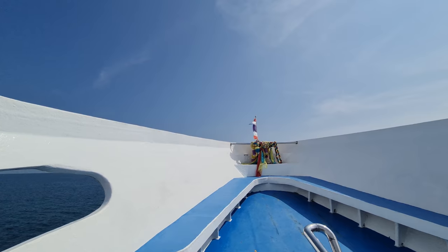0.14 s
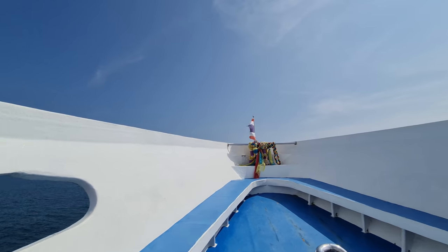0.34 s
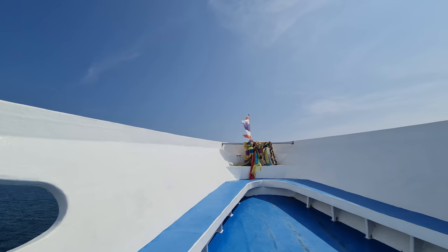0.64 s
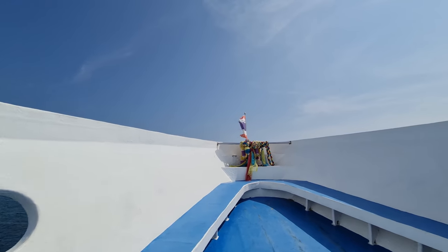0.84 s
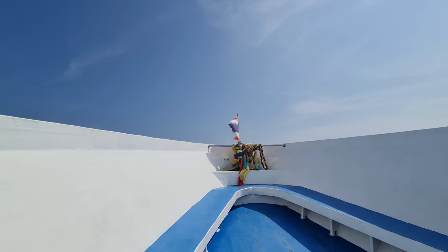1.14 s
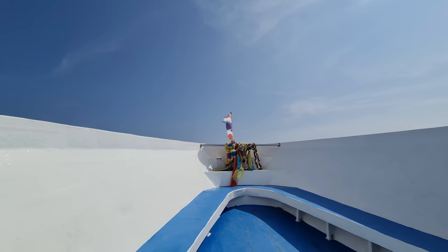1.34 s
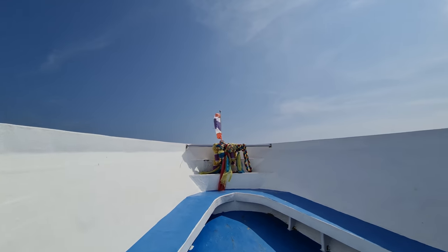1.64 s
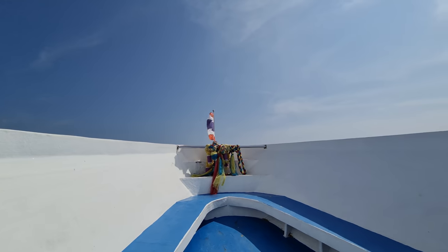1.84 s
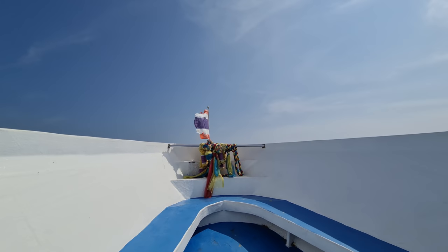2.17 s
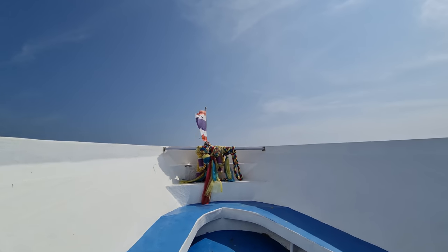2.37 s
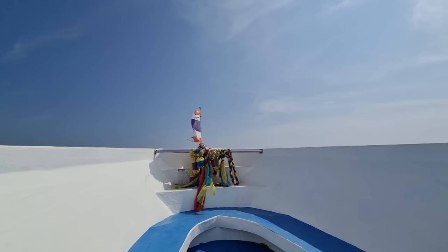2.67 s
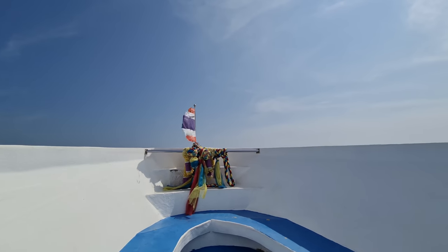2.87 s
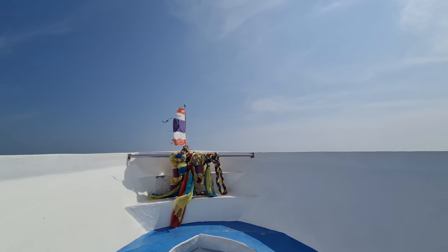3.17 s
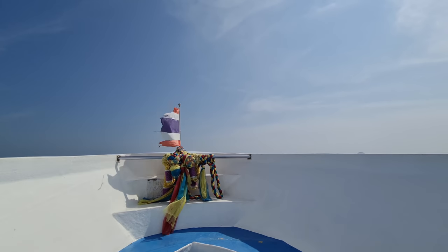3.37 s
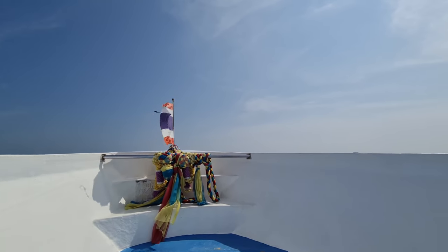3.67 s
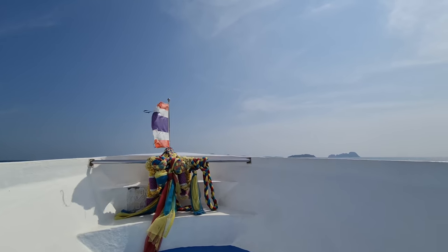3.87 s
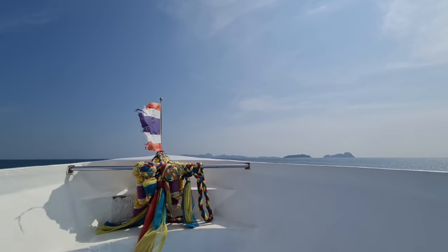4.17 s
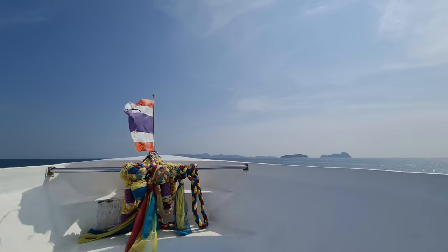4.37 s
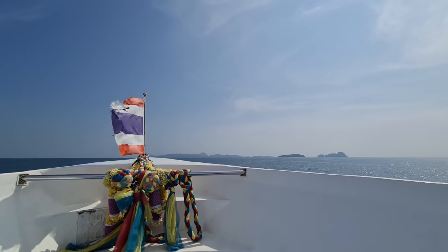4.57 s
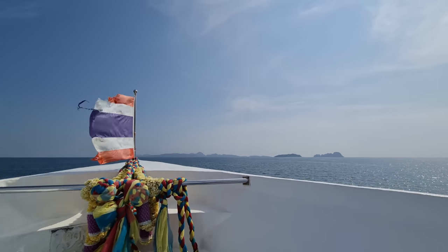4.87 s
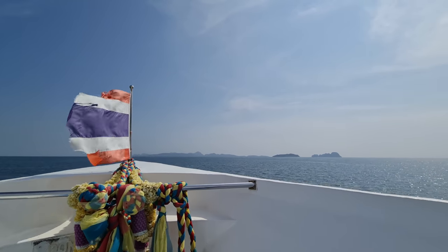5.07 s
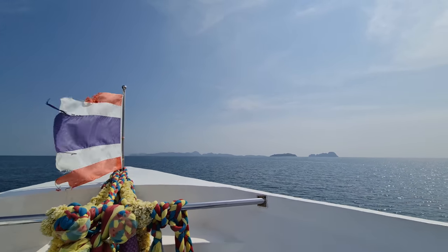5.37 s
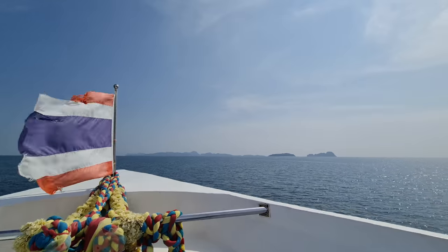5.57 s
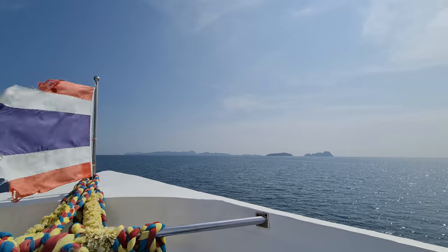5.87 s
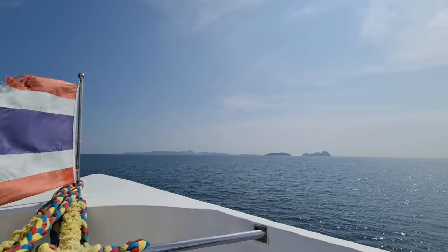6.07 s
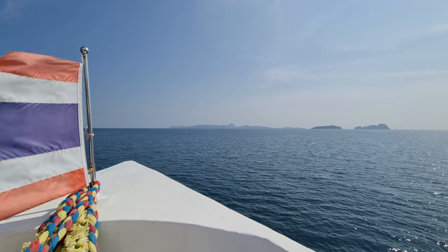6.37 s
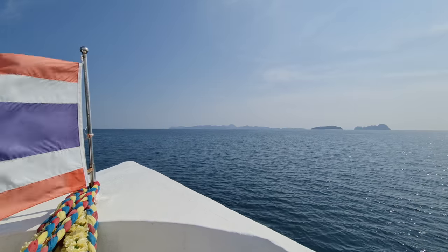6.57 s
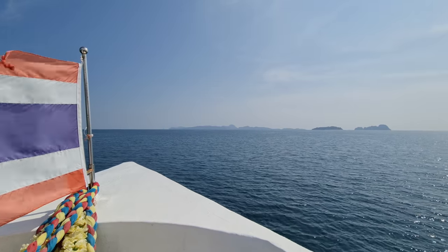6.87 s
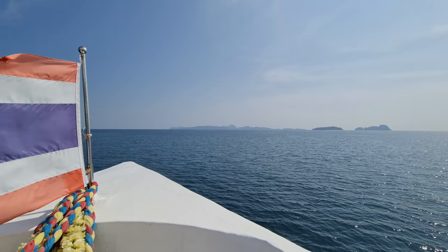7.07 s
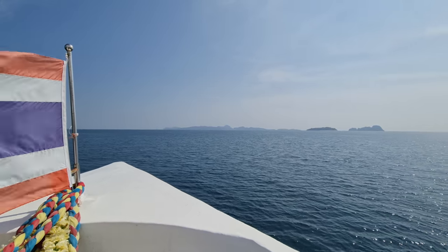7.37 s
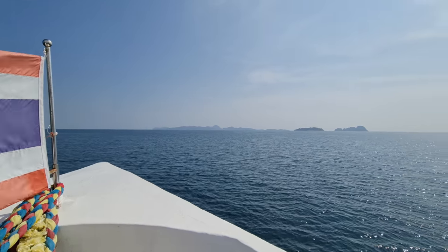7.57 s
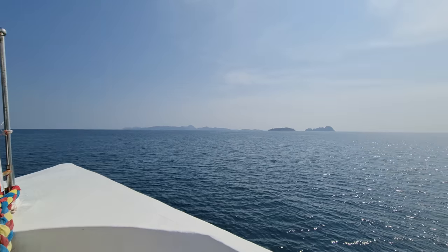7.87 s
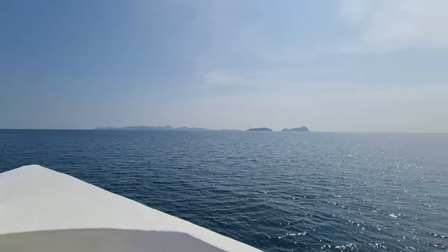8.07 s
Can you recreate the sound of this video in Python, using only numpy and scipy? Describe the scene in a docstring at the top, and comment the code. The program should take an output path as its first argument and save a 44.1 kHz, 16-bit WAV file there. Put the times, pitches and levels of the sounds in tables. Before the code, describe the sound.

On an open bow at sea, a wavering deep diesel hum and roar, buffeting wind, soft water hiss, then cloth flapping on a pole.

```python
"""On the open foredeck of a ferry, two microphone ports, left and right, facing the weather.
From the first moment the diesels drone through the hull as wavering tones over a noise roar, and the bow wave
hisses on both sides as shaped noise. Wind thumps, noise bursts that hit both ports together, come at once and
again from about 2 to 3 s. From 2.9 s a flag snaps on its pole: short noise puffs with a ringing knock.
At 6.35 s an edit jumps back and repeats the last stretch, with a click at the hard cut."""
import sys
import numpy as np
from scipy import signal
from scipy.io import wavfile
from scipy.ndimage import uniform_filter1d

SR = 44100
rng = np.random.default_rng(int(sys.argv[2]) if len(sys.argv) > 2 else 0)


def volts(x):
    """Linear amplitude factor 10**(x/20) for a level x in dB, scalar or array-like."""
    e = np.asarray(x, float) / 20
    return 10 ** e


def transcribe(signal):
    """Save signal, clipped to [-1, 1], as a 16-bit WAV file at the path in sys.argv[1]."""
    frames = np.atleast_2d(signal).T
    limited = np.clip(frames, -1, 1)
    pcm = np.round(limited * 32767).astype(np.int16)
    wavfile.write(sys.argv[1], SR, pcm)


N = 362943
CUT_S, REPEAT_S = 6.34624, 2.8  # time of the hard cut, and how far back it jumps
LENGTH = round(CUT_S * SR)  # samples before the cut
T = np.arange(LENGTH) / SR


def evened(x):
    """Scales to rms 1."""
    return x / np.sqrt(np.mean(abs(x) ** 2) + 1e-20)


def wander(shape, size):
    """Slow random drift of rms 1: white noise averaged twice over size samples."""
    once = uniform_filter1d(rng.standard_normal(shape), size=size)
    return evened(uniform_filter1d(once, size=size))


def read(points, hz):
    """Reads a spectrum table on a log-frequency axis."""
    f, value = np.transpose(points)
    return np.interp(np.log(hz + 1), np.log(f + 1), value)


def curve(table, column):
    """One dB column of a time table at every sample."""
    rows = np.array(table)
    return np.interp(T, rows[:, 0], rows[:, column])


def noise(spectrum, same, patchy_db, flicker_db, size):
    """Stereo noise from random short-time spectra with drifting patches and flicker across all bins."""
    frames, hz = 4 * LENGTH // size + 5, np.fft.rfftfreq(size, 1 / SR)
    a, b, c, d, patches = rng.standard_normal((frames, len(hz), 5)).T
    patches = evened(uniform_filter1d(uniform_filter1d(patches, 8, 0), 8, 1))
    same = np.clip(read(same, hz), -1, 1)[:, None]
    left = a + 1j * b
    right = same * left + np.sqrt(1 - same ** 2) * (c + 1j * d)
    flicker = flicker_db * rng.standard_normal(frames)
    z = np.array([left, right]) * volts(read(spectrum, hz)[:, None] + patchy_db * patches + flicker)
    return evened(signal.istft(z, nperseg=size, noverlap=3 * size // 4)[1][:, :LENGTH])


def colour(x, spectrum):
    """Causal minimum-phase filter with the given spectrum, energy 1."""
    half = np.maximum(read(spectrum, np.fft.rfftfreq(8192, 1 / SR)), -90) * np.log(10) / 20
    log_gain = np.r_[half, half[-2:0:-1]]
    taps = np.fft.ifft(np.exp(np.conj(signal.hilbert(log_gain)))).real[:4096]
    return signal.oaconvolve(x, taps[None] / np.linalg.norm(taps), axes=1)[:, :LENGTH]


def tone(hz, width, noisy):
    """A sine whose height and phase partly wander like narrow noise; higher tones differ more between the ports."""
    pole = np.exp(-np.pi * width / SR)
    drift = rng.standard_normal((2, LENGTH)) + 1j * rng.standard_normal((2, LENGTH))
    drift = evened(signal.lfilter([1], np.convolve([1, -pole], [1, -pole]), drift))
    noisy = np.clip(noisy, 0, 1)
    shared = np.sqrt(1 - noisy) + np.sqrt(noisy) * drift[0]
    both = shared + (hz + 100) / 1800 * np.array([drift[1], -drift[1]])
    pitch = hz * (1 + 0.00595 * wander(LENGTH, 9000))  # rms wander as a share of the pitch
    turns = np.cumsum(pitch) / SR + rng.random()
    return np.sqrt(2) * (both * np.exp(2j * np.pi * turns)).real


def bursts(rows, rise_s):
    """Stereo envelope of puffs that rise and die away: rows of (t/s, level/dB, left-right/dB, length/s)."""
    out = np.zeros((2, LENGTH + SR))
    for s, db, pan_db, length in rows:
        t = np.arange(0, 4 * length, 1 / SR)
        shape = (1 - np.exp(-t / rise_s)) * np.exp(-t / (length / 2))
        at = round(s * SR)
        out[:, at:at + len(t)] += volts(db + np.array([[.5], [-.5]]) * pan_db) * shape
    return out[:, :LENGTH]


# high, low and middle hull tone: f/Hz, line width/Hz, noisy share 0-1
HULL_TONES = [(106.84, 9, 0.1), (53.44, 8.8, 0.28), (77.44, 12.3, 0.33)]
# swells and dips of the hull tones: t/s, high level/dB, low level/dB, middle level/dB
HULL_SWELLS = [(0.0, -34.5, -49, -23.5), (0.1, -29, -20, -27), (0.44, -20.5, -52, -42),
               (0.55, -26.5, -23, -36), (0.63, -16.5, -18.5, -19), (0.72, -48.5, -33, -30),
               (0.86, -12, -20, -17), (1.02, -44.5, -26, -30), (1.11, -17, -48, -29),
               (1.18, -23.5, -34, -13), (1.46, -29, -26, -26.5), (2.15, -27, -45, -23.5),
               (2.19, -25.5, -51, -50), (2.24, -24, -52, -32), (2.3, -25.5, -39, -27), (2.4, -48, -48, -31),
               (2.56, -37.5, -58, -51), (2.63, -19, -29, -28), (2.74, -24, -30, -25),
               (2.86, -46.5, -55, -43), (3.05, -19, -31, -30), (3.12, -15.5, -52, -17),
               (3.2, -30.5, -21, -20.5), (3.25, -35, -53, -54), (3.3, -20.5, -39, -28),
               (3.42, -28.5, -48, -50), (3.69, -16.5, -23.5, -25.5), (4.17, -14, -21.5, -18.5),
               (4.36, -22, -27.5, -32.5), (4.57, -16, -18, -23), (4.7, -14, -38, -21),
               (4.75, -15, -19, -20.5), (5.19, -17, -18.5, -15), (5.32, -35.5, -35, -48),
               (5.37, -29.5, -27, -17.5), (5.49, -20, -19.5, -22.5), (5.61, -19.5, -37, -14),
               (5.69, -49, -18, -34), (5.74, -19.5, -10, -18), (5.95, -20, -31, -18),
               (6.14, -26.5, -24, -25), (6.2, -21, -40, -50), (6.23, -28.5, -50, -24.5),
               (6.34, -10, -37, -27)]
# a wavering companion of the middle tone: f/Hz, level relative to it/dB, width/Hz, noisy share (held to 0-1)
COMPANION = (90.5, -7, 7, 2.3)
# fainter hull tones: f/Hz, relative level/dB, width/Hz, noisy share 0-1
FAINT_HUMS = [(167.7, -31.5, 9.5, 0.42), (213, -40, 8, 0.9), (234, -42.5, 7, 0.6), (291.4, -46.5, 6.2, 0.8),
              (353.4, -35, 5.8, 0.46), (382, -37, 18.6, 0.64), (406.7, -41, 8.8, 0.7)]
# spectrum shape of the roar: f/Hz, relative level/dB per Hz
ROAR_SPECTRUM = [(15, -37.5), (25, -17.5), (98, 0.5), (126, -8), (156, -16.5), (204, -11), (278, -17.5),
                 (371, -21), (505, -28.5), (1070, -34.5), (2500, -46), (3250, -82.5), (5500, -120)]
# likeness of the roar at the two ports: f/Hz, likeness 0-1
ROAR_LIKENESS = [(25, .3), (60, 0.83), (180, 0.96), (550, 0.98), (1650, 0.28), (5000, 0)]
# drift of the fainter layers: t/s, gain of the faint hums/dB, level of the roar before its swell/dB
HUM_AND_ROAR_LEVELS = [(0, -22, -25.5), (.42, -6.5, -26), (.62, -5.5, -26), (1.0, -3, -29), (1.6, -8, -25),
                       (1.9, -1, -24.5), (2.65, -10.5, -25.5), (3.1, -10.5, -26.5), (3.55, -9.5, -25),
                       (3.8, 2, -27), (4.2, 0, -25), (4.5, -1.5, -26.5), (5.15, 2.5, -21), (5.3, -1, -26.5),
                       (5.55, -7, -29.5), (5.75, -1.5, -23), (5.95, -2, -24.5), (6.35, -12.5, -24.5)]


def engines():
    """Diesels through the hull: three strong tones near shaft orders 2, 3, 4, faint hums and a broad roar."""
    high_db = curve(HULL_SWELLS, 1)
    hull = sum(volts(curve(HULL_SWELLS, k + 1)) * tone(*row) for k, row in enumerate(HULL_TONES))
    hz, db, width, noisy = COMPANION
    hull = hull + volts(curve(HULL_SWELLS, 3) + db) * tone(hz, width, noisy)
    hums = sum(volts(db) * tone(hz, width, noisy) for hz, db, width, noisy in FAINT_HUMS)
    roar = noise(ROAR_SPECTRUM, ROAR_LIKENESS, patchy_db=3.0, flicker_db=3.0, size=2048)
    swell = volts(0.076 * (high_db - high_db.mean()))  # the roar follows this share of the high tone's swells
    hum_gain, roar_gain = volts(curve(HUM_AND_ROAR_LEVELS, 1)), volts(curve(HUM_AND_ROAR_LEVELS, 2))
    return hull + hum_gain * hums + roar_gain * swell * roar


# thumps on the ports: t/s, level/dB, left-right/dB, bright edge relative level/dB, low push relative level/dB
WIND_THUMPS = [(0.047, -12, 2.5, -26, -20), (0.069, -9.5, 11.5, -7, -19), (0.086, -11, -4.5, -3.5, -17),
               (0.095, -13.5, -4, -5, -18), (0.125, -20.5, 5, 5.5, -13), (0.166, -11, 11, -27, -17),
               (0.181, -14, -1, -5, -12), (0.336, -21.5, 0, -5.5, 0), (0.478, -25, 14, -12, -2),
               (1.691, -22, -4, -23, -11), (2.208, -22.5, -9.5, -24, -4), (2.485, -19.5, 4.5, -32, -10.5),
               (2.505, -22, -10, -29, 1), (2.612, -20, 7, -8, -3), (2.646, -13, -2, -18, -18),
               (2.698, -10, 6.5, -33, -12), (2.722, -17, 3, -29, 7), (2.738, -10, 3, -33, 4.5),
               (2.764, -23.5, 11.5, 11.5, -1), (2.797, -28.5, -2, 9, -12), (3.014, -30.5, 2, -16, 4),
               (3.177, -13, 8, 1, -16), (3.202, -16, -7.5, -6.5, -16), (3.221, -19, 3, -10, -14)]
# spectrum shapes of a thump's body, bright edge and low push: f/Hz, relative level/dB per Hz
BODY_SPECTRUM = [(150, -31), (300, -1.5), (450, -5), (700, -12.5), (1500, -37), (4000, -62.5)]
EDGE_SPECTRUM = [(300, 2), (700, 8.5), (1300, 0.5), (2700, -19.5), (3600, -41), (5000, -77)]
PUSH_SPECTRUM = [(20, -20), (60, -8.5), (200, 4), (350, -11), (1000, -51), (4000, -94)]
# spectrum shape of the flutter: f/Hz, relative level/dB per Hz
FLUTTER_SPECTRUM = [(25, -20), (60, -2.5), (200, -8), (420, -10), (900, -30), (4000, -64.5)]
# flutter between thumps: t/s, level/dB
BREEZE_LEVEL = [(0, -19.5), (.3, -34), (2.0, -34.5), (3.0, -38), (3.42, -26), (3.6, -42.5), (5.2, -38.5),
                (5.31, -23.5), (5.42, -37.5), (6.35, -39.5)]
# brief soft moans of wind in the rails: middle t/s, half length/s, f/Hz, level/dB
RAIL_MOANS = [(1.25, 0.1, 547, -40), (5.13, 0.2, 723, -47.5)]


def wind():
    """Strong thumps hit both ports together with mostly unlike noise, over a lumpy flutter separate on each port."""
    thump_s = 0.024  # length of a thump's body
    strength = volts(3.0 * np.minimum(rng.exponential(1, (2, LENGTH)), 4))
    eddies = strength * (rng.random((2, LENGTH)) < 250 / SR)  # about 250 a second on each port
    flutter = evened(colour(eddies * rng.choice([-1, 1], eddies.shape), FLUTTER_SPECTRUM))
    lulls = volts(3.4 * wander((2, LENGTH), 2200))  # the flutter comes and goes on each port
    lulls = lulls / np.sqrt(np.mean(lulls ** 2))
    moans = 0
    for at, half, hz, db in RAIL_MOANS:
        moans = moans + volts(db) * np.exp(-((T - at) / half) ** 2) * tone(hz, 17, 0.77)

    puffs = rng.standard_normal((2, LENGTH))
    puffs = puffs + 0.26 * puffs[::-1]  # share that the other port also feels
    grain = evened(uniform_filter1d(rng.standard_normal((2, LENGTH)), size=200))
    puffs = evened(volts(3.1 * grain) * puffs)  # uneven inside a thump
    s, db, pan_db, edge_db, push_db = np.transpose(WIND_THUMPS)
    length = thump_s * np.ones(len(s))
    body = colour(bursts(zip(s, db, pan_db, length), 0.0048) * puffs, BODY_SPECTRUM)
    edge = colour(bursts(zip(s, db + edge_db, pan_db, 0.61 * length), 0.004) * puffs, EDGE_SPECTRUM)
    push = colour(bursts(zip(s, db + push_db, pan_db, 0.89 * length), 0.0039) * puffs, PUSH_SPECTRUM)

    # flutter gathers around each thump, 11 dB under its table level
    halos = [volts(peak_db - 11) * np.exp(-((T - at - thump_s / 2) / 0.031) ** 2) for at, peak_db in zip(s, db)]
    flutter_gain = volts(curve(BREEZE_LEVEL, 1)) * lulls + np.max(halos, axis=0)
    return flutter_gain * flutter + body + edge + push + moans


# delay of the starboard wave at the left port, and of the port wave at the right: s
PORT_DELAYS = (0.00048, 0.00032)


def both_sides(pair, far_share):
    """A source to port and one to starboard, each reaching the far microphone late and weaker."""
    late = [np.roll(x, round(s * SR)) for x, s in zip(pair[::-1], PORT_DELAYS)]
    return evened(pair + np.reshape(far_share, (-1, 1)) * np.array(late))


# snaps: t/s, level/dB, knock relative level/dB, treble relative level/dB, knock f/Hz
FLAG_SNAPS = [(2.8921, -33.5, 3.5, -25, 1110), (3.571, -43, -10.5, -11, 1000),
              (3.5869, -22.5, -11, -29, 1156), (3.678, -30.5, -13, -24, 900),
              (3.7867, -39.5, 8.5, -16, 1145), (4.122, -36.5, 2.5, -21, 990), (4.211, -31.5, -1, -14, 1120),
              (4.225, -39.5, 0.5, -19, 1270), (4.3249, -25.5, -2, -24, 1314), (4.362, -30, -4.5, -24, 1400),
              (4.487, -33, -13, -13, 1013), (4.905, -28, -9, -18, 890), (5.01, -35.5, -5, -12, 1050),
              (5.0529, -28.5, 2, -17, 900), (5.0743, -34, -8, -19, 851), (5.103, -36, 8.5, -21, 888),
              (5.164, -37.5, 5.5, -10, 1410), (5.1915, -37, -9, -2, 835), (5.237, -37.5, 4.5, -18, 1220),
              (5.309, -33.5, -3, -9, 920), (5.4589, -31, -13, -19, 851), (5.4803, -35, 2.5, -23, 1070),
              (5.588, -32, -16, -4, 851), (5.631, -33.5, -1, -3, 872), (5.669, -31.5, 2, -22, 960),
              (5.698, -35, -15, -1, 1030), (5.724, -32, -2, -14, 993), (5.933, -28.5, -4.5, -9, 907),
              (6.0547, -28.5, -2, -9, 1060), (6.243, -20, -10.5, -12, 1630)]
# knock, cloth and treble bands of a snap: low f/Hz, high f/Hz, length/s
CLOTH_BANDS = [(690, 1920, 0.012), (1540, 4470, 0.0032), (4970, 8900, 0.0025)]


def flag():
    """Each snap of the cloth is a few ms of noise and a ringing knock on the pole; small rustles fall between."""
    s, db, knock_db, treble_db, knock_hz = np.transpose(FLAG_SNAPS)
    cloth = both_sides(rng.standard_normal((2, LENGTH)), 0.19)
    out = np.zeros((2, LENGTH))
    for part_db, (low_hz, high_hz, length) in zip((db + knock_db, db, db + treble_db), CLOTH_BANDS):
        puffs = bursts([(a, b, 2.4, length) for a, b in zip(s, part_db)], 0.00043) * cloth
        band = signal.butter(2, [low_hz, high_hz], "band", fs=SR)
        out = out + signal.lfilter(*band, puffs) * np.sqrt(SR / 2 / (high_hz - low_hz))

    ring_s = 0.0044  # decay time of the knock's ring
    t = np.arange(0, 6 * ring_s, 1 / SR)
    for at, ring_db, hz in zip(s, db + knock_db - 1.5, knock_hz):
        shape = (1 - np.exp(-t / 0.00093)) * np.exp(-t / ring_s)
        start = round(at * SR)
        out[:, start:start + len(t)] += volts(ring_db) * shape * np.sin(2 * np.pi * hz * t)

    nearness = np.interp(T, [0, 3.2, 3.6], [.2, .3, 1])  # rustles grow louder, mostly after 3.2 s
    strength = volts(3 * np.minimum(rng.exponential(1, LENGTH), 3))
    rustle = strength * (rng.random(LENGTH) < 45 / SR)  # about 45 a second
    rustle = signal.lfilter([1], [1, -np.exp(-1 / (0.0039 * SR))], rustle) * cloth
    rustle = colour(rustle, [(400, -25), (1200, 21.0), (3000, 16), (8000, -3), (15000, -18.0)])
    return out + volts(-47.0) * nearness * rustle


# spectrum shapes of churning water and fine spray: f/Hz, relative level/dB per Hz
WAVE_SPECTRUM = [(180, -19.5), (300, -18), (367, 1), (405, -2), (459, -14), (502, -11), (1060, -19.5),
                 (1780, -26), (6000, -45), (7800, -78), (13200, -120)]
SPRAY_SPECTRUM = [(1470, -19), (2500, -1.5), (3480, -4.5), (4290, -9.5), (4630, -8), (6760, -11.5),
                  (8080, -11), (12000, -14.5), (15800, -19)]
# the sea before its gusts and side balance: t/s, churning wave level/dB, fine spray level/dB
SEA_LEVELS = [(0, -32.5, -51), (.18, -37.5, -48.5), (.37, -37.5, -41.5), (.55, -31.5, -48),
              (1.1, -32.5, -45.5), (1.55, -35.5, -53.5), (2.03, -32, -41), (2.19, -31.5, -45),
              (2.37, -28, -40.5), (2.6, -33, -49.5), (2.78, -33.5, -46), (3.4, -37, -50), (3.7, -39, -55),
              (4.1, -29.5, -48), (4.5, -37.5, -52.5), (4.97, -32, -47.5), (5.4, -39, -55.5),
              (5.7, -33.5, -53), (5.92, -37.5, -54), (6.23, -36, -49.5), (6.35, -39.5, -50)]


def bow_wave():
    """Churning water and fine spray on both sides of the bow, a smooth hiss."""
    apart = [(100, 0), (16000, 0)]  # the noises of the two sides are unlike
    wave = both_sides(noise(WAVE_SPECTRUM, apart, patchy_db=3.8, flicker_db=1.44, size=1024), (0.65, 0.45))
    spray = both_sides(noise(SPRAY_SPECTRUM, apart, patchy_db=1.0, flicker_db=0.5, size=1024), (0.18, 0.08))
    gusts = volts(1.0 * wander(LENGTH, 2500))  # spray comes in soft waves
    sides = volts(np.array([[.7], [-.7]]))  # wave leans left, spray right
    churning = volts(curve(SEA_LEVELS, 1)) * gusts ** 1.37 * wave * sides
    return churning + volts(curve(SEA_LEVELS, 2)) * gusts * spray / sides


# jump of the wave at the cut, left and right: full scale 1
CUT_JUMP = (-0.41, -0.27)


def scene():
    """The deck, then the edit that repeats its last stretch, with a step in the wave at the cut."""
    deck = engines() + wind() + flag() + bow_wave()
    again = deck[:, LENGTH - round(REPEAT_S * SR):][:, :N - LENGTH]
    # the last few ms bend away so that the wave steps by the set jump
    lift = again[:, :1] - deck[:, -1:] - np.array(CUT_JUMP)[:, None]
    return np.hstack([deck + lift * np.exp((T - CUT_S) / 0.0018), again])


def low_pass(x):
    """Removes everything above the highest recorded frequency."""
    return signal.sosfilt(signal.butter(12, 16830, fs=SR, output="sos"), x)


def record(dry):
    """The two microphone signals meet a hard ceiling at full scale."""
    mix = np.clip(dry, -1, 1)
    return low_pass(mix)


dry = scene()
out = record(dry)
transcribe(out)
```